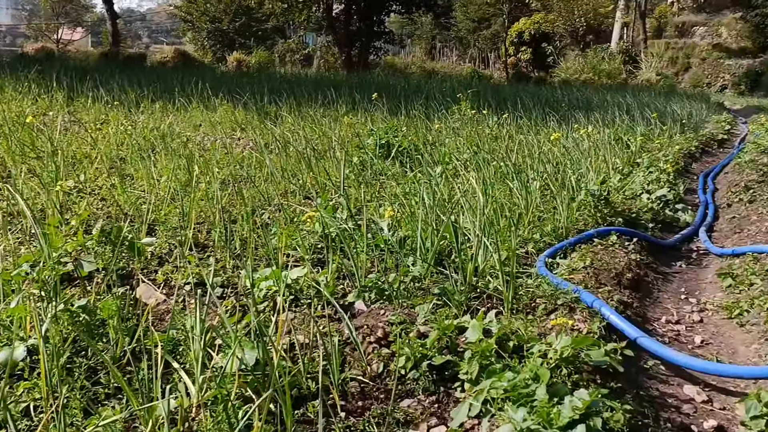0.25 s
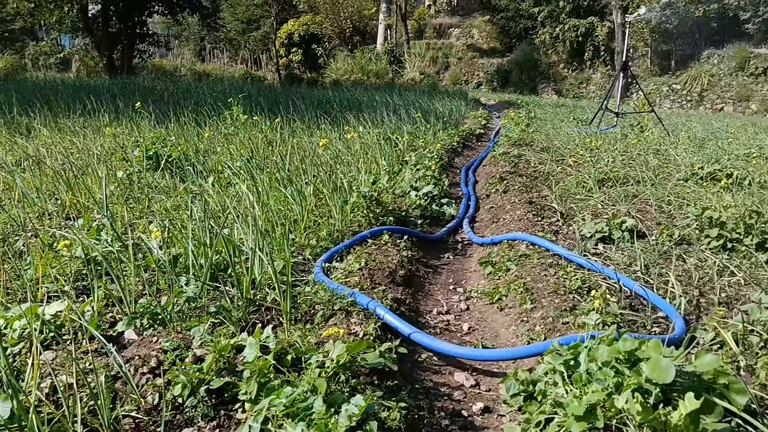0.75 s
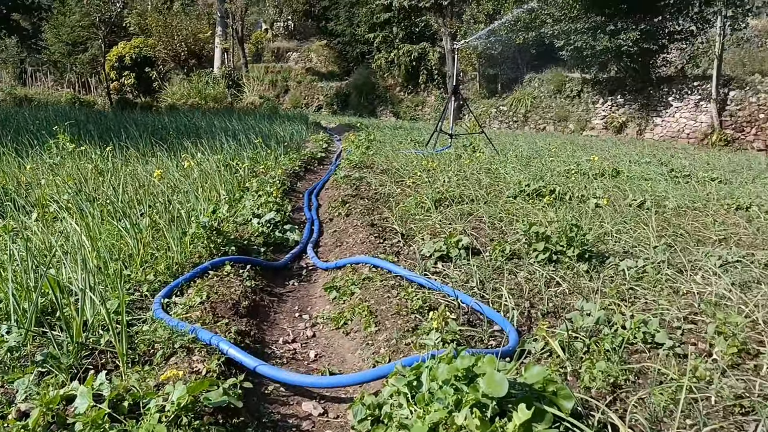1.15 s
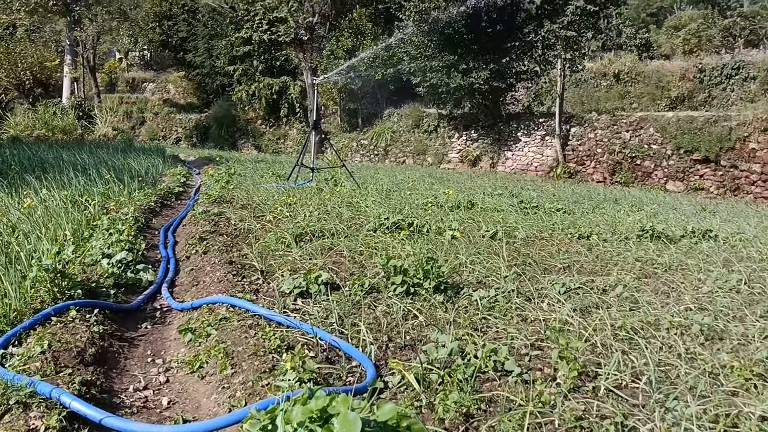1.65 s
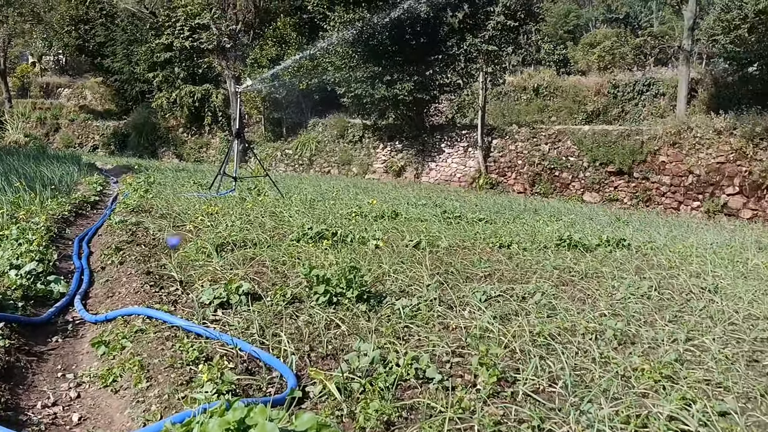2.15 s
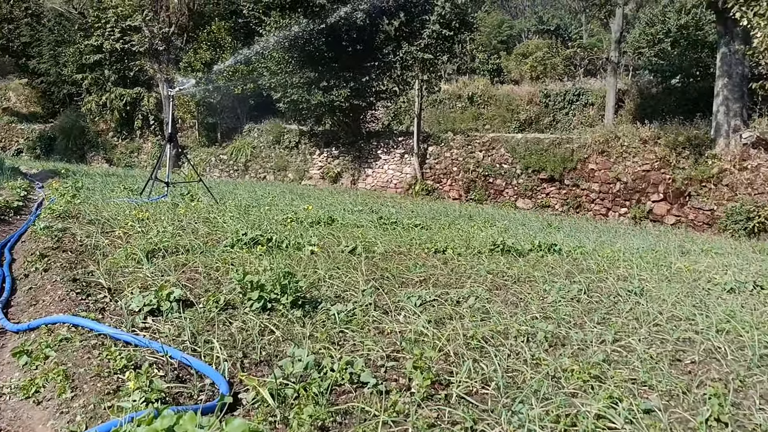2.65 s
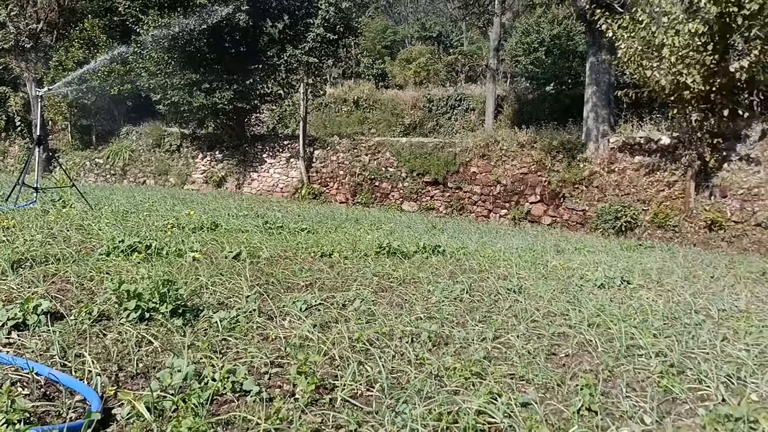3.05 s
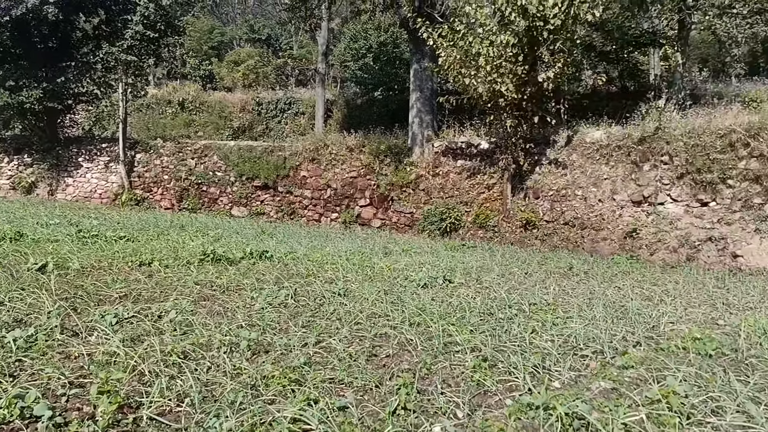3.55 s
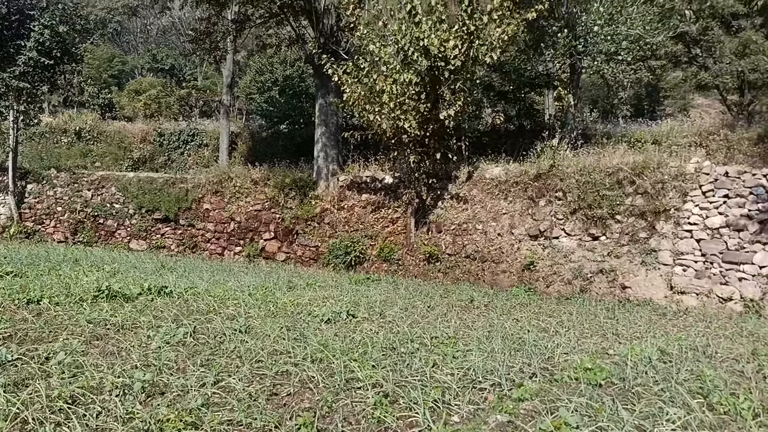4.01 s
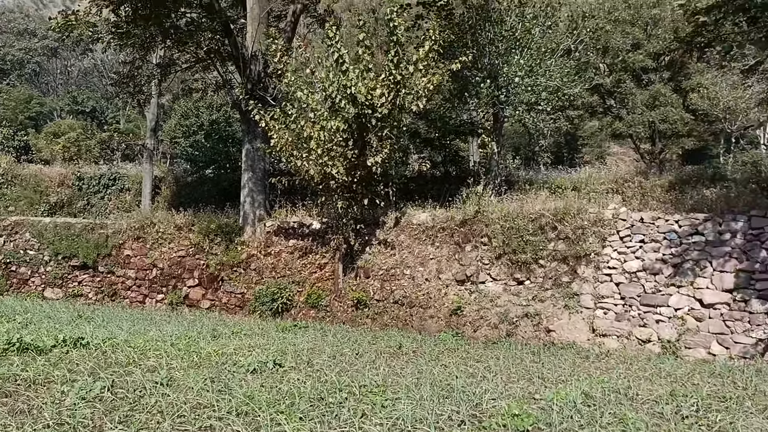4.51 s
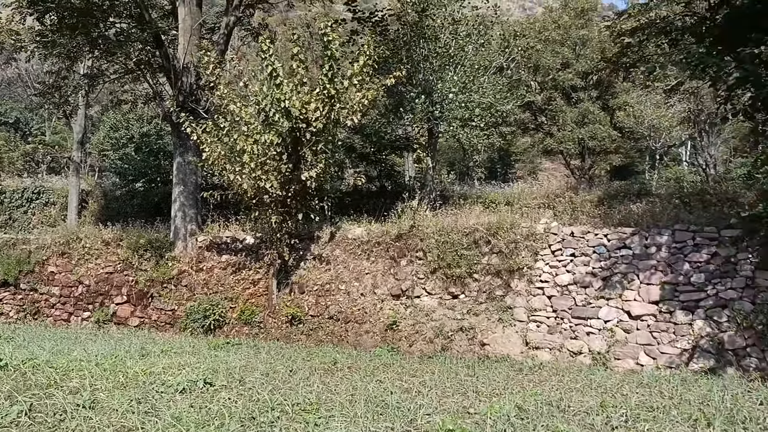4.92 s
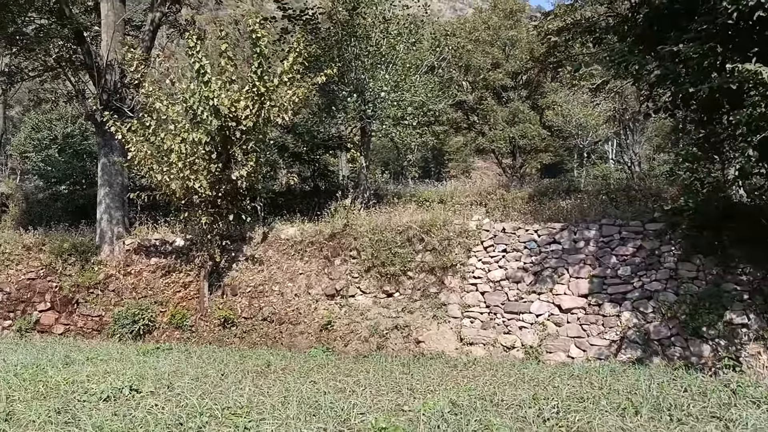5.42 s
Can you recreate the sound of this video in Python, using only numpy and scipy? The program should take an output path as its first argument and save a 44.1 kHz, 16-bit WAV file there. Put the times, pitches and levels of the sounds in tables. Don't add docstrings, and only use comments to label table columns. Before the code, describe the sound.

An open hillside field, quiet low air and a distant pump hum, heard on a hand-held stereo phone. From the start, a sprinkler about ten metres away cuts its jet roughly every 0.16 seconds: bright, splashy spurts, each trailing a patter of drops, over faint hiss. A small snap comes at 0.4; from 1.25 to 2.65 the phone casing creaks and crackles close on the right, with the sharpest snap at 1.32. One faint bird whistle sounds at 1.55. The pump swells between 2 and 3.3. The spurts soften a little around 3.4. At 4.4 a hard clack reverses the arm: cuts now come about twelve a second, short and dry, with plastic clacks ringing near 3 kHz, while the spray hiss grows. A finger knocks at 5.06 and dull rubs follow at 5.36 and 5.6. The fast rattle continues to the end at 6.

```python
import sys
import numpy as np
from scipy import signal
from scipy.fft import rfft, irfft, next_fast_len
from scipy.io import wavfile
from scipy.ndimage import uniform_filter1d, map_coordinates

SR = 44100
rng = np.random.default_rng(int(sys.argv[2]) if len(sys.argv) > 2 else 0)


def log_audio(samples):
    frames = np.atleast_2d(samples).T
    limited = np.clip(frames, -1, 1)
    pcm = np.round(limited * 32767).astype(np.int16)
    wavfile.write(sys.argv[1], SR, pcm)


def voltage_ratio(decibels):
    exponent = np.asarray(decibels, float) / 20
    return 10 ** exponent


N = 267687
T = np.arange(N) / SR


def read(points, hz):
    f, v = np.transpose(points)
    return np.interp(np.log(np.maximum(hz, 1)), np.log(f), v)


def colour(x, points):
    size = 4096
    gain_db = read(points, np.arange(size // 2 + 1) * SR / size)
    cepstrum = irfft(gain_db * np.log(10) / 20)
    cepstrum[1:size // 2] *= 2
    response = irfft(np.exp(rfft(cepstrum[:size // 2], size)))[:size // 2]
    return signal.fftconvolve(x, response[None], axes=1)[:, :N]


def pair(alike):
    size = next_fast_len(N)
    shared = np.clip(read(alike, np.arange(size // 2 + 1) * SR / size), 0, 1)
    a, b = rfft(rng.standard_normal((2, size)), axis=1)
    left = shared * a + np.sqrt(1 - shared ** 2) * b
    return irfft(np.array([left, a]), size, axis=1)[:, :N]


def band(x, hz, width):
    return signal.lfilter(*signal.iirpeak(hz, hz / width, SR), x)


def butter(x, order, hz, kind):
    return signal.sosfilt(signal.butter(order, hz, kind, fs=SR, output="sos"), x)


def unit(x):
    return x / np.sqrt(np.mean(x ** 2))


def walk(rate):
    hold = int(SR / rate)
    steps = np.repeat(rng.standard_normal(N // hold + 1), hold)
    return 1.18 * uniform_filter1d(uniform_filter1d(steps, hold), hold)[:N]


def lumpy(noise, rate, own_db):
    total = 0
    for hz in 700 * 1.17 ** np.arange(21):
        flicker = voltage_ratio(own_db * walk(min(rate, hz / 12)))
        total = total + band(noise, hz, hz / 6) * flicker
    return unit(total)


def add(out, s, sound):
    i = max(int(s * SR), 0)
    out[:, i:i + sound.shape[1]] += sound[:, :N - i]


# start_s, level_db
SPRAY_LEVEL = [(0, -48), (.29, -50.5), (.98, -51), (1.43, -47), (1.76, -47), (2.13, -49.5), (2.72, -47.5),
               (3.85, -49.5), (4.34, -46.5), (4.46, -42.5), (4.58, -44.5), (5.06, -43.5), (5.7, -41.5),
               (6.07, -42)]
# frequency_hz, density_db (per Hz)
JET_SPECTRUM = [(300, -12), (700, -21.5), (1200, -18), (2000, -2.5), (2900, -2.5), (4000, 0.5), (6000, 0),
                (7500, 3.5), (10000, 0.5), (16000, 0.5)]
# frequency_hz, likeness (0-1)
JET_LIKENESS = [(500, .6), (3000, .45), (6000, .35), (8500, .05)]


def jet():
    s, spray_db = np.transpose(SPRAY_LEVEL)
    mist_db = -57.5 + 0.74 * (spray_db + 47.5)
    spit = voltage_ratio(0.69 * walk(25.23) + 0.51 * walk(500))
    drops = lumpy(pair(JET_LIKENESS), rate=40, own_db=2.5)
    spray = unit(colour(drops * spit, JET_SPECTRUM))
    low = butter(spray, 4, 7400, "low")
    mist = spray - low
    return low * voltage_ratio(np.interp(T, s, spray_db) + 8.0) + mist * voltage_ratio(np.interp(T, s, mist_db) + 17.5)


# frequency_hz, density_db (per Hz)
AIR_SPECTRUM = [(20, -7), (40, -1), (100, -2.5), (220, -4), (350, -7), (560, -16.5), (850, -1.5),
                (1150, -10), (1500, 1), (3000, -14.5), (8000, -59)]
# frequency_hz, likeness (0-1)
AIR_LIKENESS = [(30, .25), (70, .45), (150, .65), (350, .72), (700, .65), (1300, .1)]


def field_air():
    return unit(colour(pair(AIR_LIKENESS), AIR_SPECTRUM)) * voltage_ratio(-57 + 0.41 * walk(3.1))


# start_s, level_db
BREEZE = [
    (0, -6),
    (1.7, -4),
    (2.0, 6),
    (2.8, 3.5),
    (3.3, -5),
    (6.07, -4),
]
# pitch_hz, level_db, breeze_share (ratio), late_swell_db
TONES = [
    (65.4, -66, .95, .01),
    (127.6, -70, 0.39, -2),
    (177.5, -79, -0.091, 15),
]


def pump():
    width_hz, throb_db, throb_rate_hz = 8.2, 2, 2.87
    swell_middle_s, swell_length_s = 4.98, 0.18
    breeze_db = np.interp(T, *np.transpose(BREEZE))
    late = 1 / (1 + np.exp((swell_middle_s - T) / swell_length_s))
    out = np.zeros((2, N))
    for hz, db, share, swell_db in TONES:
        hum = band(pair([(30, 0.32), (200, 0.88)]), hz, width_hz)
        hum = unit(band(hum, hz, 2 * width_hz))
        throb = throb_db * walk(throb_rate_hz)
        out += hum * voltage_ratio(db + share * breeze_db + swell_db * late + throb - 5)
    return out


# start_s, facing (0-1)
SPOON_FACING = [(0, 1), (1.0, 1), (1.9, .5), (2.6, 0.66), (2.9, 0.87), (3.5, 0.8), (3.8, 1), (4.4, 0.99),
                (4.85, 1.01), (5.15, 0.56), (5.6, 0.88), (6.07, .55)]
# frequency_hz, density_db (per Hz)
CUT_SPECTRUM = [(500, -15), (1200, -6.5), (2000, -3.5), (3000, -2.5), (4500, 1.5), (6200, -1), (8000, 0.5),
                (11000, 0), (16000, -4.5)]
# frequency_hz, likeness (0-1)
CUT_LIKENESS = [(500, .7), (3000, .62), (6000, .55), (8500, .1)]


def cuts(table, low_hz, low_width, low_offset_db, rise, usual_fall_db, patter_db, patter_s):
    usual_db, usual_s = -25.5, .024
    fall_per_db, fall_db_per_s = 0.94, 445
    hidden_db = -22
    mist_rise_s, mist_hang_s, hang_share = 0.002, 0.019, 0.15
    out = np.zeros((2, N))
    noise = colour(lumpy(pair(CUT_LIKENESS), rate=150, own_db=3.2), CUT_SPECTRUM) * voltage_ratio(2.8 * walk(800))
    t = np.arange(6000) / SR
    for s, db, hz, length in table:
        low_db = hidden_db * (1 - np.interp(s, *np.transpose(SPOON_FACING)))
        low_gain = voltage_ratio(low_db + low_offset_db) - 1
        water = noise[:, int(s * SR):int(s * SR) + len(t)]
        u = t[:water.shape[1]] - .021
        water = water + 1.16 * band(water, hz, 250) + low_gain * band(water, low_hz, low_width)
        octaves = (np.arange(6) + rng.random(6)) / 6
        water = water + .7 * sum(band(water, 2000 * 3.6 ** k, 160) for k in octaves)

        fall_db = usual_fall_db + fall_per_db * (db - usual_db) + fall_db_per_s * (length - usual_s)
        inside = voltage_ratio(-fall_db * (1 - np.exp(-u / (.5 * length))))
        inside = inside / (1 + np.exp((u - length) / .0022))
        patter = voltage_ratio(patter_db) * np.exp(-u / patter_s)
        patter = patter + voltage_ratio(-23) * np.exp(-((u - .058) / 0.0044) ** 2)
        shape = np.where(u < 0, np.exp(np.minimum(u, 0) / rise), inside + patter)
        strength = np.sqrt(np.sum((water * shape) ** 2) / np.sum(2 * shape ** 2))

        mist = butter(water, 4, 7400, "high")
        late = uniform_filter1d(shape, int(mist_rise_s * SR), origin=int(0.12 * mist_rise_s * SR))
        hang = uniform_filter1d(late, int(mist_hang_s * SR), mode="constant")
        late = (1 - hang_share) * late + hang_share * hang
        sound = water * shape + mist * (late - shape)
        add(out, s - .02, sound / strength * voltage_ratio(db - 4.5))
    return butter(out, 3, [1150, 15000], "band")


# start_s, peak_db, brightest_hz, length_s
FORWARD_CUTS = [(.0916, -26, 6400, .022), (.2518, -24.5, 5820, 0.021), (.409, -27.5, 5900, 0.03),
                (.58, -25, 6600, 0.018), (.728, -28.5, 6300, 0.036), (.901, -24.5, 6600, 0.011),
                (1.0533, -24.5, 6400, 0.013), (1.2094, -26, 6210, 0.029), (1.3673, -25.5, 5790, .021),
                (1.5234, -24.5, 4400, 0.017), (1.6816, -25.5, 5400, 0.021), (1.8387, -23.5, 5200, 0.016),
                (1.9955, -24, 2920, 0.017), (2.154, -21, 5400, 0.047), (2.306, -26.5, 6100, 0.031),
                (2.481, -25, 2950, 0.012), (2.63, -25.5, 5650, 0.018), (2.7903, -27, 6030, 0.013),
                (2.946, -26.5, 5760, 0.023), (3.104, -25.5, 6500, 0.021), (3.259, -28, 6650, 0.028),
                (3.4156, -30, 6240, 0.022), (3.5854, -29, 5400, 0.024), (3.7516, -26, 3800, 0.018),
                (3.9064, -27.5, 3730, 0.015), (4.077, -26.5, 3600, 0.023), (4.228, -27.5, 3950, 0.028)]


def forward_sweep():
    return cuts(FORWARD_CUTS, 2300, 800, 0.93, 0.0037, 12.8, -10.5, 0.048)


# start_s, peak_db, pitch_hz, decay_s
CASING_KNOCKS = [
    (5.064, -41.5, 294, 0.008),
    (5.068, -47.5, 87, 0.01),
                 (0.251, -54, 130, .015),
    (.575, -53, 190, .013),
    (5.847, -51, 150, 0.013),
    (0.896, -55, 170, 0.02),
    (1.832, -50.5, 129, 0.015),
    (2.145, -52, 141, 0.025),
    (2.299, -53, 181, 0.0093),
    (3.335, -59, 186, 0.016),
    (3.581, -52, 164, 0.018),
    (4.951, -55.5, 190, 0.011),
]


def thuds():
    out, t = np.zeros((2, N)), np.arange(4000) / SR
    for s, db, hz, decay in CASING_KNOCKS:
        mode = np.sin(2 * np.pi * hz * t) * np.exp(-t / decay)
        add(out, s, np.tile(mode, (2, 1)) * voltage_ratio(db))
    return out


# start_s, peak_db, low_ring_hz, length_s
CASING_CREAKS = [(1.256, -37, 4160, .0089), (1.331, -36, 3630, .01), (1.348, -29.5, 3740, .013),
                 (1.4123, -24.5, 3900, 0.018), (1.438, -32, 3580, 0.011), (1.4493, -28.5, 3740, .0082),
                 (1.459, -36, 4130, 0.0092), (1.647, -45, 4000, .0048), (1.7574, -27, 2880, 0.015),
                 (1.852, -28, 4200, 0.021), (1.891, -23.5, 3070, 0.0065), (2.195, -28.5, 3830, .017),
                 (2.2, -28, 2820, 0.028), (2.261, -32, 3500, 0.043), (2.325, -40, 2920, 0.0065),
                 (2.532, -44, 3940, .011), (2.59, -29.5, 3260, 0.012), (2.647, -32, 3160, 0.0056)]
# start_s, peak_db, low_ring_hz, length_s
CASING_SNAPS = [
    (.411, -22, 5580, 0.0026),
    (1.3207, -12.5, 5300, 0.00073),
    (1.324, -17.5, 3950, 0.0017),
    (2.158, -25, 5370, .0016),
    (2.5577, -24, 5440, .005),
    (3.737, -34, 6500, .003),
]


def creaks():
    short_db, long_db, short_slip_s = -5, -11.5, .004
    near_pan_db, faint_db, pan_span_db = -17, -43, 15
    out, t = np.zeros((2, N)), np.arange(2000) / SR
    for s, db, hz, length in CASING_CREAKS + CASING_SNAPS:
        low_db = long_db + (short_db - long_db) * np.exp(-(length / short_slip_s) ** 2)
        pan_db = near_pan_db * np.tanh((db - faint_db) / pan_span_db)
        chance = rng.standard_normal((2, len(t)))
        envelope = np.exp(-t / length) * np.minimum(t / (0.074 * length), 1)
        snaps = chance[0] * voltage_ratio(5.4 * chance[1]) * envelope
        snaps[3] += 6 * np.exp(-length / 0.0031)
        high_ring = band(band(snaps, 5820, 520), 6400, 550)
        low_ring = band(band(snaps, hz, 740), hz, 740)
        sound = 0.93 * high_ring + voltage_ratio(low_db + 11) * low_ring + 0.41 * band(snaps, 5000, 4000)
        sound = butter(sound, 2, 1700, "high")
        sound = sound / np.abs(sound).max()
        add(out, s, np.array([voltage_ratio(pan_db + 3.5), 1])[:, None] * sound * voltage_ratio(db + 2))
    return out


# start_s, end_s
BIRD_SPAN = (1.545, 1.655)
BIRD_PITCH = (2490, 2530, 2460)


def bird():
    start, end = BIRD_SPAN
    u = np.clip((T - start) / (end - start), 0, 1)
    pitch = np.interp(u, (0, .5, 1), BIRD_PITCH)
    return voltage_ratio(-51) * np.sin(np.pi * u) ** 0.38 * np.sin(2 * np.pi * np.cumsum(pitch) / SR)


# start_s, peak_db, brightest_hz, length_s
RETURN_CUTS = [(4.3967, -21.5, 5740, .036), (4.4716, -25, 5940, 0.029), (4.5503, -24.5, 6700, 0.033),
               (4.6333, -28.5, 5800, 0.027), (4.7105, -26, 4240, 0.03), (4.796, -27, 4180, .026),
               (4.8728, -26.5, 6100, 0.035), (4.9551, -26.5, 5700, .031), (5.035, -25, 5230, .034),
               (5.1183, -22, 4500, 0.036), (5.201, -24, 5170, 0.026), (5.2779, -27, 5570, 0.036),
               (5.363, -22, 5900, .048), (5.4438, -22.5, 5750, 0.042), (5.5194, -25, 3970, 0.03),
               (5.603, -20.5, 4300, 0.039), (5.681, -27.5, 3950, 0.031), (5.764, -27, 4000, 0.019),
               (5.8447, -23.5, 4900, 0.032), (5.9275, -22.5, 3900, 0.023), (6.002, -27, 3940, 0.022)]


def return_sweep():
    return cuts(RETURN_CUTS, 2880, 200, 14, 0.0013, 6.4, -40, 0.012)


# start_s, peak_db
STOP_CLACKS = [(4.4183, -13), (4.432, -22), (4.509, -20.5), (4.588, -21.5), (4.6696, -23.5), (4.751, -19.5),
               (4.8315, -21), (4.9136, -21), (4.9946, -21), (5.0764, -22), (5.157, -23.5), (5.238, -24),
               (5.319, -24.5), (5.4, -23), (5.4796, -24), (5.5578, -25), (5.64, -24.5), (5.72, -23),
               (5.8, -25.5), (5.881, -25.5), (5.9598, -24), (6.0383, -27.5)]


def clacks():
    seen_s, swing_s = 5.08, .08
    rattle_db, rattle_s, rattle_width_hz = -22, 0.02, 440
    out, t = np.zeros((2, N)), np.arange(2000) / SR
    for s, db in STOP_CLACKS:
        seen = 1 / (1 + np.exp((seen_s - s) / swing_s))
        tick_db = np.interp(seen, (0, 1), (-16.5, -2.5))
        contact_s = np.interp(seen, (0, 1), (0.0013, 0.00099))
        hz = 2994 * (1 + .015 * rng.standard_normal())
        swell = (t / contact_s) ** 2 * np.exp(2 - 2 * t / contact_s * 0.9) / 3
        ring = np.sin(2 * np.pi * hz * t) * swell
        tick = unit(band(rng.standard_normal(len(t)), 4360, 1300)) * swell
        rattle = unit(band(rng.standard_normal((2, len(t))), hz, rattle_width_hz)) * np.exp(-t / rattle_s)
        add(out, s, rattle * voltage_ratio(db + rattle_db - 2.2 * seen))
        blow = np.array([.8 * ring, ring]) + voltage_ratio(tick_db + 0.1) * tick
        add(out, s - .0005, blow * voltage_ratio(db + 6))
    return out


# start_s, level_db, centre_hz, length_s
FINGER_RUBS = [
    (5.362, -48, 340, .066),
    (5.362, -52, 930, .055),
    (5.588, -56.5, 330, .066),
    (5.59, -56, 1020, .06),
]


def rubs():
    out, t = np.zeros((2, N)), np.arange(4000) / SR
    for s, db, hz, length in FINGER_RUBS:
        pressure = np.sin(np.pi * np.clip(t / length, 0, 1)) ** 0.67
        push = voltage_ratio(1.7 * walk(148)[:len(t)]) * rng.standard_normal(len(t)) * pressure
        sound = band(band(push, hz, .9 * hz), hz, .9 * hz)
        level = sound[:int(length * SR)].std()
        add(out, s, np.outer([1, voltage_ratio(-3)], sound) / level * voltage_ratio(db))
    return out


# start_s, left_lead_ms
PHONE_TURN = [
    (0, -.4),
    (.75, -.3),
    (1.0, .43),
    (3.1, .39),
    (3.6, .5),
    (6.07, .54),
]


def scene():
    left, right = jet() + forward_sweep() + return_sweep() + clacks()
    lead = np.interp(T, *np.transpose(PHONE_TURN)) * SR / 1000
    left = map_coordinates(left, [np.arange(N) + lead], order=3, mode="nearest")
    near = creaks() + rubs() + thuds()
    far = field_air() + pump() + bird()
    return np.array([left, right]) + near + far


def roll_off(x):
    return signal.sosfilt(signal.butter(12, 16510, fs=SR, output="sos"), x)


# frequency_hz, gain_db
LEFT_PORT = [(30, -1), (200, 3), (1000, 2), (2000, -8.5), (3000, -3), (4500, -7.5), (6500, -10),
             (8000, -13.5), (11000, -12.5), (13000, -12.5), (16000, -24)]
# frequency_hz, gain_db
RIGHT_PORT = [(30, 4), (1000, 5), (2000, -0.5), (2900, 2.5), (3600, 0), (5000, 0.5), (6300, 4.5),
              (7000, -2.5), (7500, -19.5), (9500, -15), (12500, -6), (16000, -12)]


def record(dry):
    ports = np.vstack([colour(dry[:1], LEFT_PORT), colour(dry[1:], RIGHT_PORT)])
    ports = signal.sosfilt(signal.ellip(12, .2, 70, 15830, fs=SR, output="sos"), ports)
    return roll_off(ports)


dry = scene()
out = record(dry)
log_audio(out)
```